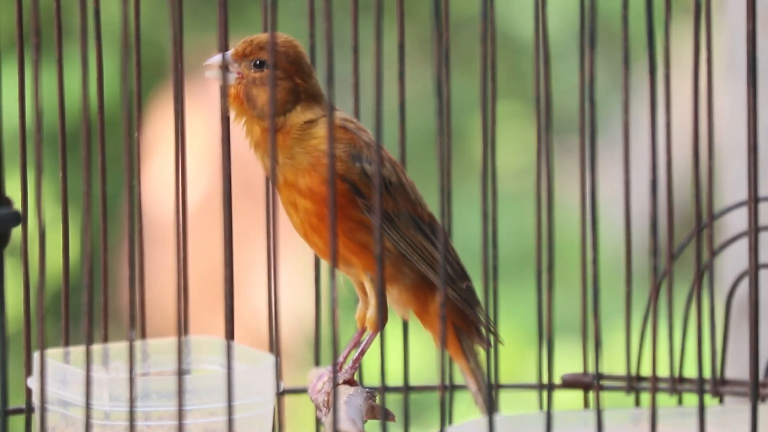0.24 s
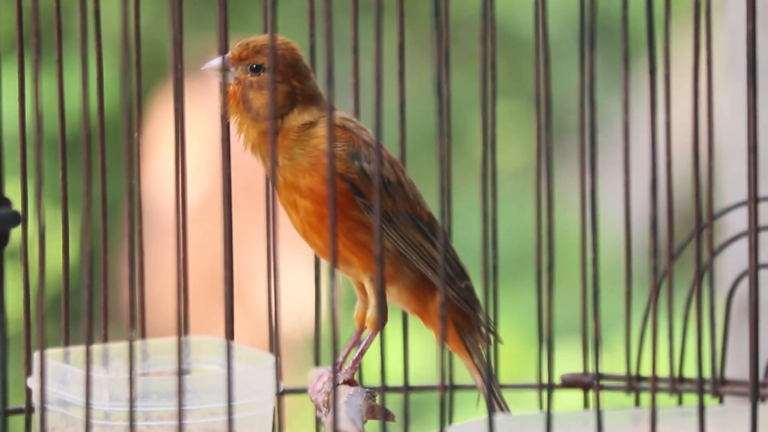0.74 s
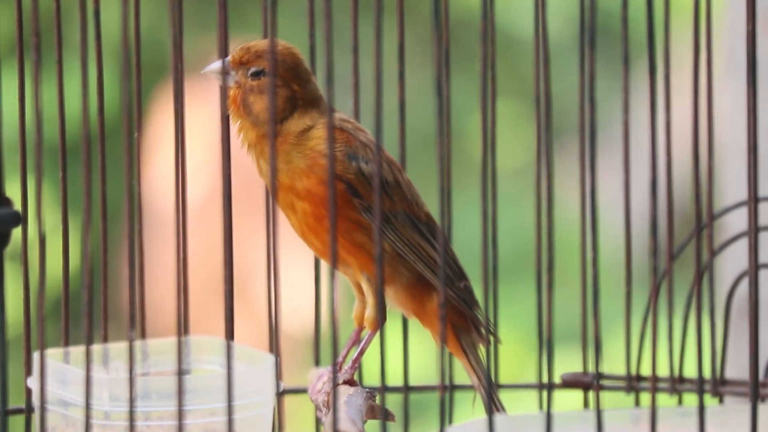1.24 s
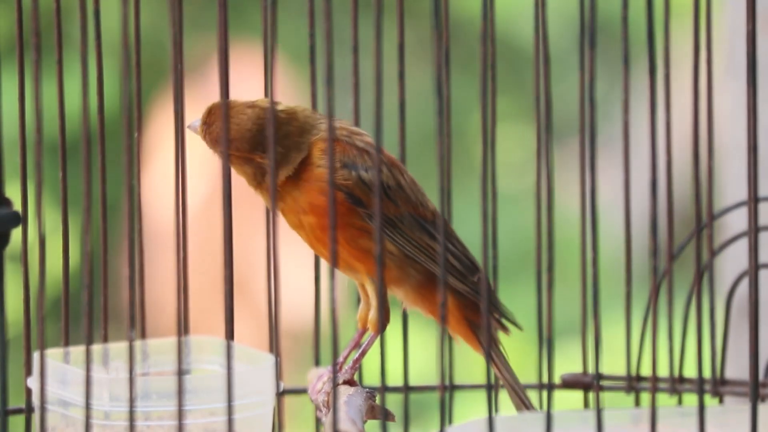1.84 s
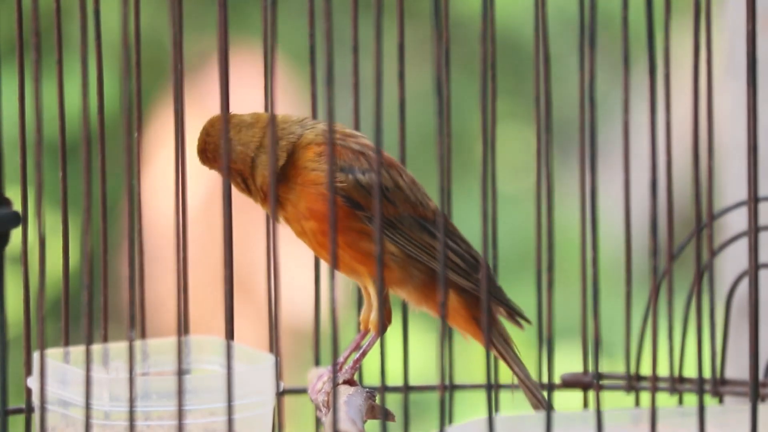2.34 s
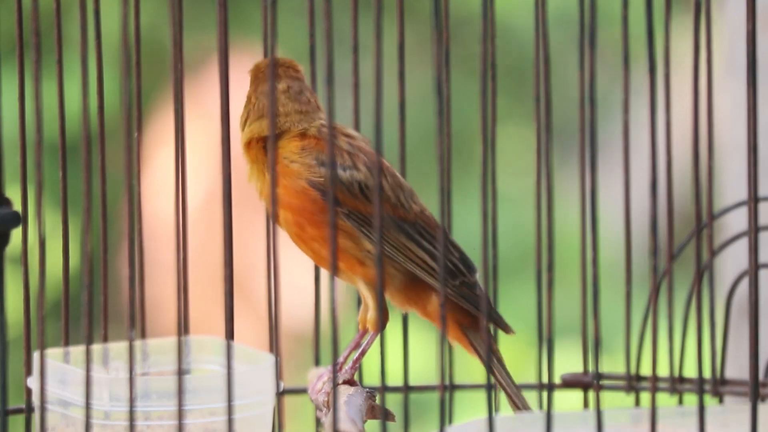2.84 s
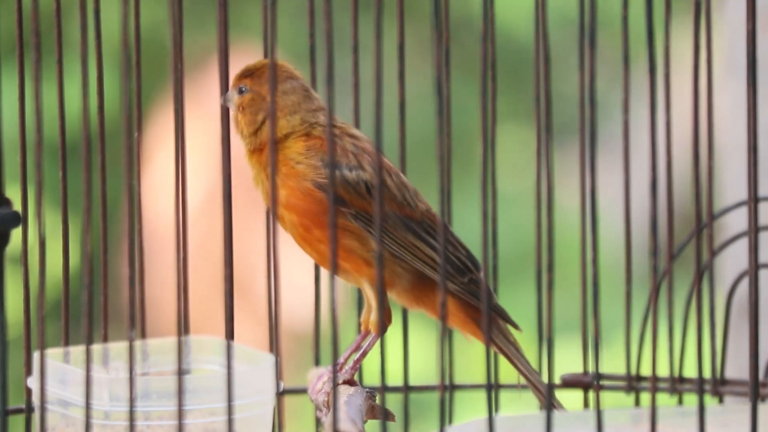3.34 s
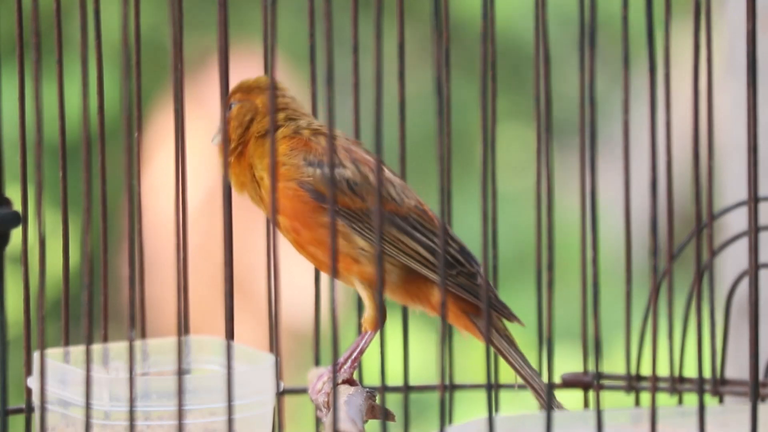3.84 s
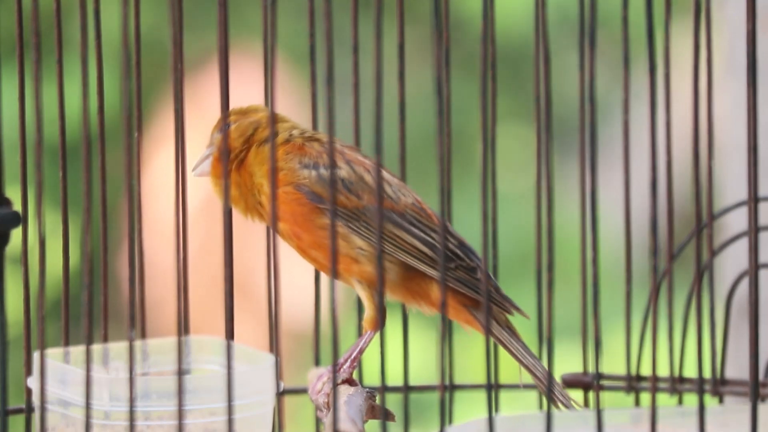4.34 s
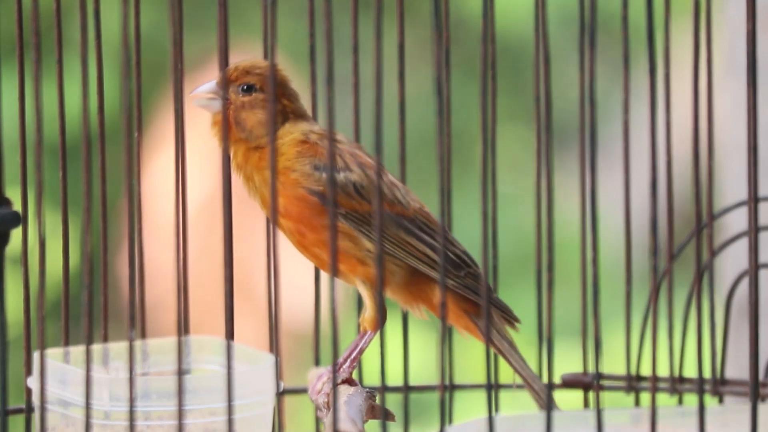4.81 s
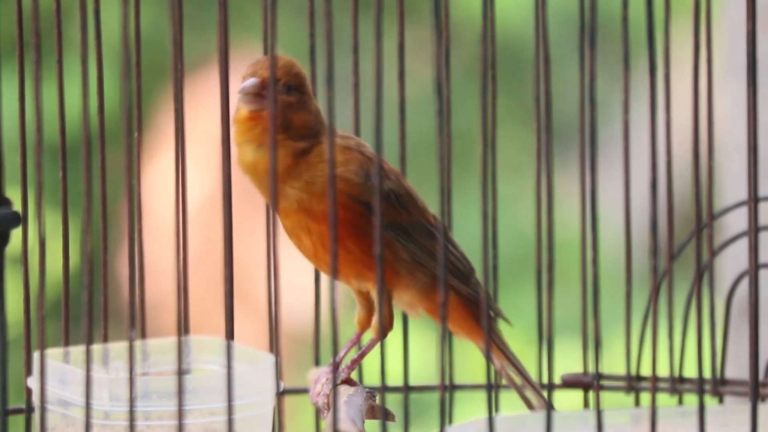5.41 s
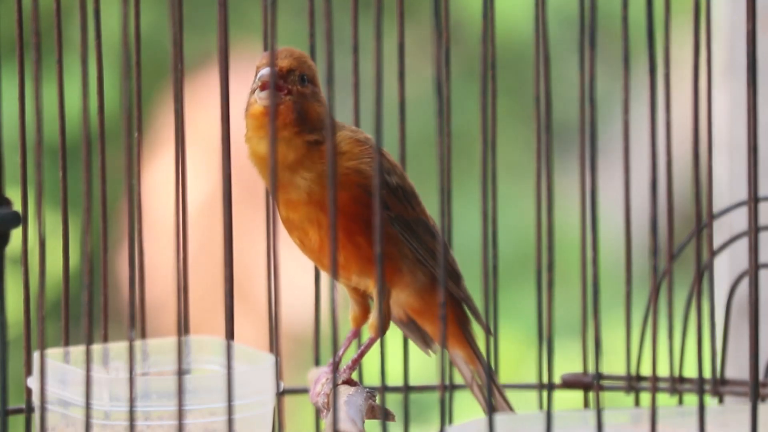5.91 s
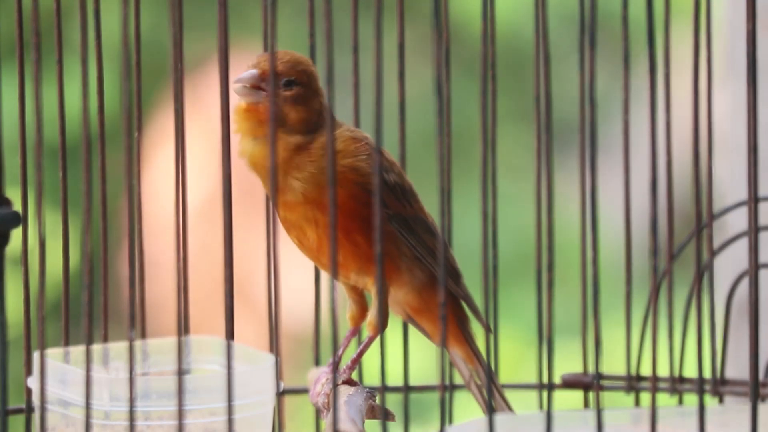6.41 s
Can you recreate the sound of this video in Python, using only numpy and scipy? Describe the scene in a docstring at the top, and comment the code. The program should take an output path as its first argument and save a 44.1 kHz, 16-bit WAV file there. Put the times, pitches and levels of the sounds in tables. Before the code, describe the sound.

Near, clear canary whistles sweep down from high to mid-high pitch, about eight a second, then pause. Faint rustles and a far bird's rough, echoey chips fill the gap above low traffic. The canary returns softly, bursts into a dense rolling trill of about thirty pulses a second that grows louder, changes to rapid swooping notes, and ends on slower slurs. Small porch echo, close stereo pickup.

```python
"""On a porch, a caged canary sings close by while another small bird chips farther off over a low traffic rumble.
The song runs: slow falling slurs, a pause, two soft notes, a rapid roll, quick slurs, slow slurs again.
Each canary note is one whistled gesture, a near-pure tone with weak overtones, echoed by the cage and walls.
The far bird is rough glides heard mostly as reverberation; engines are wavering sines; air and rustles are noise."""
import sys
import numpy as np
from scipy import signal
from scipy.fft import rfft, irfft, next_fast_len
from scipy.io import wavfile
from scipy.ndimage import uniform_filter1d

SR = 44100
rng = np.random.default_rng(int(sys.argv[2]) if len(sys.argv) > 2 else 0)


def dump_mix(stems):
    """Bounce the given channels to the path in sys.argv[1] as a 16-bit WAV at rate SR."""
    frames = np.atleast_2d(stems).T  # one column per channel
    limited = np.clip(frames, -1, 1)  # hard clip at full scale
    pcm = np.round(limited * 32767).astype(np.int16)
    wavfile.write(sys.argv[1], SR, pcm)


N = 293706
LEAD_IN = SR // 4   # samples computed ahead of time 0 and trimmed at the end
TIME = np.arange(-LEAD_IN, N) / SR   # s


def from_db(db):
    """Decibels to gain."""
    return 10 ** (np.asarray(db) / 20)


def rms_one(x):
    """Scale to unit power."""
    return x / np.sqrt(np.mean(x ** 2) + 1e-20)


def along(rows, at):
    """Every later column of a table, interpolated along its first."""
    first, *columns = np.transpose(rows)
    return [np.interp(at, np.sort(first), column) for column in columns]


def at_hz(points, hz):
    """A spectrum read on a log-frequency axis."""
    point_hz, values = np.array(points).T
    return np.interp(np.log(hz + 1), np.log(point_hz), values)


def drift(rate_hz, size):
    """Smooth random wander with spread about 1, made of noise below rate_hz."""
    sos = signal.butter(4, rate_hz, fs=SR, output="sos")
    wander = signal.sosfilt(sos, rng.standard_normal(size + LEAD_IN))
    settled = wander[LEAD_IN // 2:]
    return rms_one(settled)[-size:]


def highpass(sound, low_hz, order):
    """Pass what lies above low_hz."""
    return signal.sosfilt(signal.butter(order, low_hz, "high", fs=SR, output="sos"), sound)


def add(track, start_s, sound):
    """Mix a sound into a track."""
    i = round(start_s * SR) + LEAD_IN
    part = sound[:max(len(track) - i, 0)]
    track[i:i + len(part)] += part


# slow slurs of the opening: (time of the accent [s], accent level [dB], high-side level [dB])
OPENING_SLURS = [(-.004, -10.5, -13), (.1139, -10.5, -13.5), (0.2328, -11, -14.5), (0.3505, -11, -13),
                 (0.4716, -10.5, -13), (.593, -11.5, -13.5)]
# the slur that closes the opening: (time of the accent [s], accent level [dB], high-side level [dB])
CLOSING_SLUR = [(0.7201, -13, -13)]
# slow slurs that end the song: (time of the accent [s], accent level [dB], high-side level [dB])
RETURNING_SLURS = [(5.9916, -13.5, -21), (6.11, -12.5, -19.5), (6.227, -13, -18), (6.343, -12.5, -17.5),
                   (6.4614, -11, -17), (6.578, -11.5, -16.5), (6.696, -11.5, -13)]
# two soft rising notes before the roll: (time [s], pitch [Hz], level [dB])
LEAD_NOTES = [(3.4105, 3510, -42), (3.418, 3560, -39), (3.426, 3680, -38), (3.43, 3500, -61),
              (3.449, 3700, -48), (3.46, 4270, -50), (3.468, 4600, -40), (3.477, 4644, -32.5),
              (3.492, 4630, -59)]
# slur shapes: top_hz [Hz], sag of the fall [0-1], hook_hz_per_s [Hz/s], opening_db [dB], names in _s [s];
# a length factor later stretches their times. The quick shape gets its sag and hook from the run below.
OPENING_SHAPE = dict(top_hz=7163, fall_s=0.076, sag=0.078, hook_hz_per_s=122000, hook_s=0.0071, opening_db=-32, lead_s=0.025, high_swell_s=0.025, high_fade_s=0.005, low_swell_s=.011, low_fade_s=0.0098)
CLOSING_SHAPE = dict(top_hz=7050, fall_s=.073, sag=.2, hook_hz_per_s=52000, hook_s=0.018, opening_db=-29, lead_s=0.028, high_swell_s=0.019, high_fade_s=.008, low_swell_s=0.028, low_fade_s=0.0093)
RETURNING_SHAPE = dict(top_hz=7040, fall_s=.074, sag=0.0602, hook_hz_per_s=107000, hook_s=0.0076, opening_db=-33, lead_s=.027, high_swell_s=0.016, high_fade_s=0.0081, low_swell_s=0.0098, low_fade_s=0.01)
SLOW_HZ, CLOSING_HZ = 3333, 3455   # mean pitch at the accent


def canary():
    """The whole song at the beak: the tone, and the treble that comes with it."""
    roll_times = beats(ROLL_TEMPO, count=28)
    lead_times = np.arange(LEAD_NOTES[0][0], LEAD_NOTES[-1][0], 1 / SR)
    slow = [slur(OPENING_SHAPE, s, SLOW_HZ, 0.95, *levels) for s, *levels in OPENING_SLURS]
    closing = [slur(CLOSING_SHAPE, s, CLOSING_HZ, 1, *levels) for s, *levels in CLOSING_SLUR]
    lead = [(lead_times, *along(LEAD_NOTES, lead_times))]
    roll = [roll_pulse(s, *along(ROLL_COURSE, s)) for s in roll_times]
    quick = [quick_slur(s) for s in beats(QUICK_TEMPO, count=17)]
    slow_again = [slur(RETURNING_SHAPE, s, SLOW_HZ, 0.98, *levels) for s, *levels in RETURNING_SLURS]
    tone, overtones = (phrase(slow, waver=0.005, overtone_db=9.5, throat_hz=2550)
                       + phrase(closing, waver=0.0029, overtone_db=8.5, throat_hz=2920)
                       + phrase(lead, waver=0.005, overtone_db=15.5, throat_hz=3045)
                       + phrase(roll, waver=0.0051, overtone_db=8.0, throat_hz=2830)
                       + phrase(quick, waver=0.01, overtone_db=10.0, throat_hz=2870)
                       + phrase(slow_again, waver=0.0069, overtone_db=15.0, throat_hz=2650))
    snaps = highpass(roll_snaps(roll_times, snap_db=-23, decay_s=0.002) + 1e-18, 4200, order=4)
    return tone + snaps, overtones + rasp(tone, rasp_db=-21.5, low_hz=9000)


FLICK_S, FLICK_FROM_HZ = .01, 4800   # the upward flick, before the length factor
PITCH_SCATTER, HOOK_SCATTER = .005, .15   # spread from note to note, as a share


def slur(shape, s, accent_hz, length, accent_db, high_db):
    """A slur flicks up to its top, falls to the accent and ends in a downward hook: (times, pitch, level).

    The high side of the syrinx opens softly, swells to a peak lead_s before the accent
    and hands over to the low side, which gives the accent.
    """
    t = np.arange(-shape["fall_s"] - FLICK_S, shape["hook_s"], 1 / (SR * length))
    height = np.clip(-t / shape["fall_s"], 0, 1)   # 1 at the top, 0 at the accent
    accent_hz = accent_hz * (1 + PITCH_SCATTER * rng.standard_normal())
    fall = accent_hz + (shape["top_hz"] - accent_hz) * height * (1 - shape["sag"] * (1 - height))
    below_top = np.minimum((t + shape["fall_s"]) / FLICK_S, 0) ** 2
    flick = (shape["top_hz"] - FLICK_FROM_HZ) * below_top
    hook_rate = shape["hook_hz_per_s"] * (1 + HOOK_SCATTER * rng.standard_normal())
    hook = hook_rate * np.maximum(t, 0)
    opening = np.where(t < -shape["lead_s"], shape["opening_db"], -np.inf)
    high = high_db + swell_db(t + shape["lead_s"], shape["high_swell_s"], shape["high_fade_s"])
    low = accent_db + swell_db(t, shape["low_swell_s"], shape["low_fade_s"])
    return s + t * length, fall - flick - hook, np.max([opening, high, low], axis=0)


def swell_db(t, swell_s, fade_s, roundness=1.55):
    """A rounded rise and fall about t = 0, down 20 dB at swell_s before and fade_s after."""
    return -20 * np.maximum(-t / swell_s, t / fade_s) ** roundness


# shape that all quick slurs share, with keys as in the slow shapes
QUICK_SHAPE = dict(top_hz=7024, fall_s=0.044, hook_s=0.0068, opening_db=-37, lead_s=0.019, high_swell_s=.0115, high_fade_s=0.0049, low_swell_s=0.0093, low_fade_s=0.0095)
# quick slurs straighten, shorten and shift their weight to the accent: (time [s], sag of the fall [0-1],
# hook before the length factor [Hz/s], accent pitch [Hz], length factor, accent level [dB], high-side level [dB])
QUICK_COURSE = [(4.626, .55, 30000, 3788, 1.15, -17.5, -18), (4.79, 0.61, 32500, 3834, 1.095, -14.5, -16),
                (5.11, .45, 41000, 3770, 1.06, -16, -17), (5.35, 0.38, 55000, 3865, 1.035, -13, -20.5),
                (5.6, .35, 58000, 3840, .97, -14.5, -20), (5.81, 0.19, 67000, 3906, .84, -12.5, -20.5),
                (5.88, 0, 80600, 4280, 0.83, -15.5, -27.5)]


def quick_slur(s):
    """A quick slur, shaped by how far the run has come."""
    sag, hook, *effort = along(QUICK_COURSE, s)
    return slur(dict(QUICK_SHAPE, sag=sag, hook_hz_per_s=hook), s, *effort)


# parts of each roll pulse: flick_hz [Hz], names in _s [s], names in _db [dB against the pulse's peak]
PULSE_SHAPE = dict(flick_hz=7350, flick_s=.014, flick_db=-21.5, flick_swell_s=.012, handover_s=0.0048, swell_s=0.0028, scoop_s=.0018, hold_db=-9.5, hold_s=0.0058)
# the roll climbs, swells and smooths out:
# (time [s], pitch [Hz], scoop size [Hz], fade to -20 dB [s], peak level [dB])
ROLL_COURSE = [(3.619, 3780, 710, 0.0026, -27), (3.68, 4140, 725, 0.006, -22),
               (3.8, 4238, 714, .005, -18.5), (4.0, 4265, 650, 0.0042, -18), (4.13, 4380, 700, 0.0022, -17),
               (4.39, 4490, 597, 0.0032, -16), (4.46, 4680, 296, 0.006, -17.5),
               (4.5, 4690, 300, 0.0036, -17)]


def roll_pulse(s, pitch_hz, scoop_hz, fade_s, level_db):
    """A faint falling flick on the high side, then the low side scoops up to its pitch: (times, pitch, level)."""
    handover_s = PULSE_SHAPE["handover_s"]
    t = np.arange(-PULSE_SHAPE["flick_s"], PULSE_SHAPE["hold_s"], 1 / SR)
    pitch_hz = pitch_hz * (1 + PITCH_SCATTER * rng.standard_normal())
    flick = np.interp(t, [t[0], -handover_s], [PULSE_SHAPE["flick_hz"], pitch_hz])
    scoop = pitch_hz - scoop_hz * (1 - np.tanh(1 + t / PULSE_SHAPE["scoop_s"]))
    high = PULSE_SHAPE["flick_db"] + swell_db(t + handover_s, PULSE_SHAPE["flick_swell_s"], fade_s)
    hold = np.where(t > 0, PULSE_SHAPE["hold_db"], -np.inf)
    low = np.maximum(swell_db(t, PULSE_SHAPE["swell_s"], fade_s), hold)
    on_high_side = t < -handover_s
    return s + t, np.where(on_high_side, flick, scoop), level_db + np.where(on_high_side, high, low)


def roll_snaps(times, snap_db, decay_s):
    """Each pulse of the roll has a tiny decaying snap of broadband noise at its beat."""
    out = np.zeros(len(TIME))
    t = np.arange(SR // 100) / SR
    for s in times:
        pulse_db = along(ROLL_COURSE, s)[-1]
        snap = rng.standard_normal(len(t)) * np.exp(-t / decay_s)
        add(out, s, from_db(pulse_db + snap_db) * snap)
    return out


# the beat of the quick run, from its first note on: (time [s], rate [notes/s])
QUICK_TEMPO = [(4.6265, 12.41), (4.95, 12.22), (5.25, 12.71), (5.45, 12.67), (5.67, 13.28), (5.81, 14.49)]
# the beat of the roll, from its first note on: (time [s], rate [notes/s])
ROLL_TEMPO = [(3.619, 33.64), (3.8, 31.41), (4.15, 30.55), (4.36, 29.57), (4.425, 28.15), (4.46, 25.7)]


def beats(tempo, count):
    """Note times that follow a tempo curve."""
    times = [tempo[0][0]]
    while len(times) < count:
        rate, = along(tempo, times[-1])
        times.append(times[-1] + 1 / rate)
    return times


def phrase(notes, waver, overtone_db, throat_hz):
    """Notes of (times, pitch, level) whistled through one setting of the throat."""
    out = np.zeros((2, len(TIME)))
    for t, *gesture in notes:
        hz, level_db = uniform_filter1d(np.array(gesture), size=48)   # muscles round every turn
        for track, part in zip(out, whistle(hz, level_db, waver, overtone_db)):
            add(track, t[0], part)
    # the throat is tuned to the phrase and passes little below its lowest pitch
    return highpass(out + 1e-18, throat_hz, order=6)


# second overtone colour, before the phrase's overtone gain: (overtone frequency [Hz], level against tone [dB])
SECOND_HARMONIC = [(5000, -46.5), (7000, -40.5), (8200, -40.5), (9300, -38), (11000, -22.5), (12500, -32),
                   (14300, -20.5)]
# third harmonic colour, before the same gain: (overtone frequency [Hz], level against tone [dB])
THIRD_HARMONIC = [(8000, -44.5), (10000, -40.5), (11700, -33.5), (13000, -34.5), (14200, -38.5),
                  (15500, -20.5), (17000, -26.5)]
TREMOR_DB, WAVER_HZ = .6, 316   # level spread; top rate of the pitch waver


def whistle(hz, level_db, waver, overtone_db):
    """A nearly pure tone with a slight tremor; returns the tone and its weak overtones."""
    phase = 2 * np.pi * np.cumsum(hz * (1 + waver * drift(WAVER_HZ, len(hz)))) / SR
    overtones = 0
    for k, colour in ((2, SECOND_HARMONIC), (3, THIRD_HARMONIC)):
        gain = from_db(at_hz(colour, k * hz) + overtone_db)
        overtones = overtones + gain * np.sin(k * phase) * (k * hz < SR / 2)
    tremor_db = TREMOR_DB * drift(140, len(hz))
    envelope = from_db(level_db + tremor_db) * signal.windows.tukey(len(hz), .08)
    return envelope * np.sin(phase), envelope * overtones


def rasp(tone, rasp_db, low_hz):
    """A faint high fizz that follows the strength of the tone."""
    fizz = highpass(rng.standard_normal(len(tone)), low_hz, order=4)
    return from_db(rasp_db) * uniform_filter1d(np.abs(tone), size=64) * fizz


# balance of the direct sound as the head turns: (time [s], left minus right [dB])
HEAD_TURNS = [(0, -4.5), (.7, -2.5), (3.6, -3.5), (4.2, 0), (4.7, -2.5), (5.3, -2.5), (5.8, -4.5),
              (6.6, -1.5)]
# near reflections reaching the left: (delay [s], level [dB])
LEFT_REFLECTIONS = [(.0028, -9), (.0078, -25.5), (0.0104, -18.5), (0.014, -27), (0.0266, -24)]
# near reflections reaching the right: (delay [s], level [dB])
RIGHT_REFLECTIONS = [(.0024, -25), (.0080, -28.5), (.0130, -18), (.0185, -15.5), (0.031, -20)]


def porch(tone, treble, early_db, early_t60, late_db, late_t60, treble_direct_db):
    """Direct sound, a few hard reflections, a scatter of close echoes and a short tail."""
    early = from_db(early_db) * tail(early_t60, build_s=0.0053)
    response = early + from_db(late_db) * tail(late_t60, build_s=0.0357)
    for side, reflections in zip(response, (LEFT_REFLECTIONS, RIGHT_REFLECTIONS)):
        for delay, level_db in reflections:
            side[round(delay * SR)] += from_db(level_db)
    pan_db, = along(HEAD_TURNS, TIME)
    straight = tone + from_db(treble_direct_db) * treble   # the beak beams its treble past the microphone
    later = np.roll(straight, 2)   # the right microphone is a little farther
    direct = np.array([straight, later]) * from_db(pan_db * [[.5], [-.5]])
    return direct + heard(tone + treble, response)


def tail(t60, build_s):
    """Diffuse echoes of unit energy that build up and die away, unrelated left and right."""
    t = np.arange(SR // 2) / SR
    decay = from_db(-60 * t / t60)
    echoes = rng.standard_normal((2, len(t))) * decay * (1 - np.exp(-t / build_s))
    return echoes / np.sqrt(np.sum(echoes ** 2, axis=1, keepdims=True))


def heard(sound, response):
    """A sound through a two-channel echo pattern."""
    return signal.fftconvolve(sound[None], response, axes=1)[:, :len(TIME)]


# the far bird's rough falling chips: (time [s], start pitch [Hz], level before gain [dB])
CHIPS = [(1.357, 4320, -50.5), (1.465, 4720, -48.5), (1.687, 5044, -48.5), (1.741, 8440, -41),
         (1.768, 5920, -50.5), (1.825, 2940, -54), (1.871, 4940, -48), (2.046, 5120, -46.5),
         (2.292, 5320, -46), (2.803, 4300, -51), (2.987, 4980, -48.5), (3.142, 5130, -47),
         (3.336, 5140, -48), (3.542, 5840, -45)]
CHIP_S, CHIP_END_SHARE = .027, .54   # every chip falls to this share of its start pitch
# its thin whistles: (time [s], start pitch [Hz], end pitch [Hz], length [s], level before gain [dB])
THIN_WHISTLES = [(.815, 5220, 5560, 0.073, -50), (.87, 5700, 6500, 0.033, -55),
                 (.98, 4170, 4480, 0.0603, -65), (3.42, 5700, 5970, 0.028, -52)]
FAR_DIRECT_DB = -17   # direct sound against unit-energy reverberation


def far_bird(calls, gain_db, t60, build_s, rough):
    """Rough glides from far away arrive mostly as reverberation."""
    out = np.zeros(len(TIME))
    for s, start_hz, end_hz, length, level_db in calls:
        size = int(length * SR)
        hz = np.geomspace(start_hz, end_hz, size) * (1 + rough * drift(1120, size))
        glide = signal.windows.tukey(size, .4) * np.sin(2 * np.pi * np.cumsum(hz) / SR)
        add(out, s, from_db(level_db + gain_db) * glide)
    response = tail(t60, build_s)
    response[:, 0] += from_db(FAR_DIRECT_DB)
    return heard(out, response)


# soft rustles: (time of the peak [s], time to fall by e squared [s], level before flutter [dB])
RUSTLE_SWELLS = [(1.65, .07, -67), (1.86, .09, -64), (2.25, .04, -69), (2.84, .06, -69), (2.94, .08, -67),
                 (4.11, .11, -65), (4.63, .05, -61)]
# their spectrum: (frequency [Hz], relative level [dB])
RUSTLE_SPECTRUM = [(200, -23), (600, 4.5), (1800, 0), (4000, -26.5), (9000, -15), (15000, -30)]


def rustles(flutter_db):
    """Brief swells of fluttering noise."""
    swell = np.zeros(len(TIME))
    for s, length, level_db in RUSTLE_SWELLS:
        swell += from_db(level_db) * np.exp(-2 * ((TIME - s) / length) ** 2)
    flutter = from_db(flutter_db * drift(75, len(TIME)))
    return swell * flutter * stereo_noise(RUSTLE_SPECTRUM)


# lower line of the distant engines: (time [s], pitch [Hz], level before flutter [dB])
LOW_ENGINE = [(0, 221.2, -68), (.8, 218, -76), (1.4, 216, -63), (1.8, 146.6, -70.5), (2.9, 145.5, -69),
              (3.6, 150.1, -75), (4.6, 121.9, -74.5), (5.6, 123.2, -70.5), (6.66, 140.3, -85)]
# higher line of the distant engines: (time [s], pitch [Hz], level before flutter [dB])
HIGH_ENGINE = [(4.1, 400, -115), (4.42, 434, -69), (4.7, 526.5, -62), (4.92, 552, -68.5), (5.2, 577, -115)]


def drone(rows, waver, flutter_db):
    """One unsteady line of a far engine: a sine whose pitch and level wander."""
    hz, level_db = along(rows, TIME)
    phase = 2 * np.pi * np.cumsum(hz * (1 + waver * drift(44.6, len(TIME)))) / SR
    return from_db(level_db + flutter_db * drift(5.5, len(TIME))) * np.sin(phase)


# spectrum of the steady air: (frequency [Hz], relative level [dB])
AIR_SPECTRUM = [(15, -26.5), (30, -29), (50, -12), (70, -11.5), (97, -9.5), (134, -7.5), (212, -7),
                (309, -11.5), (545, -12.5), (911, -20), (1450, -20), (1900, -19.5), (2550, -15),
                (4250, -22), (8140, -23.5), (16000, -27.5)]


def air(level_db):
    """A steady bed of coloured noise, set by its overall level."""
    return from_db(level_db) * stereo_noise(AIR_SPECTRUM)


# likeness of the two sides: (frequency [Hz], left-right correlation [0-1])
SIDE_LIKENESS = [(30, 0.8), (120, .85), (500, 0.68), (2000, 0.43), (12000, 0.18)]


def stereo_noise(spectrum):
    """Coloured noise of unit power, more alike left and right in the bass."""
    size = next_fast_len(len(TIME))
    hz = np.fft.rfftfreq(size, 1 / SR)
    mid, side = rfft(rng.standard_normal((2, size))) * from_db(at_hz(spectrum, hz))
    alike = np.clip(at_hz(SIDE_LIKENESS, hz), -1, 1)
    both = np.sqrt(1 + alike) * mid + np.sqrt(1 - alike) * side * [[1], [-1]]
    return rms_one(irfft(both, size)[:, :len(TIME)])


def scene():
    """The canary in front, the neighbourhood behind."""
    song = porch(*canary(), early_db=-5.5, early_t60=0.072, late_db=-15.5, late_t60=0.25, treble_direct_db=-6.0)
    chips = [(s, hz, hz * CHIP_END_SHARE, CHIP_S, level_db) for s, hz, level_db in CHIPS]
    far = (far_bird(chips, gain_db=5.0, t60=0.27, build_s=0.0055, rough=0.073)
           + far_bird(THIN_WHISTLES, gain_db=1.5, t60=0.24, build_s=0.0036, rough=0.032))
    traffic = drone(LOW_ENGINE, waver=0.0547, flutter_db=5.0) + drone(HIGH_ENGINE, waver=.03, flutter_db=4)
    mix = song + far + rustles(flutter_db=4.3) + traffic + air(level_db=-62.5)
    return mix[:, LEAD_IN:]


def record(dry):
    """The top is cut steeply above 15.9 kHz."""
    return signal.sosfilt(signal.ellip(10, .1, 80, 15900, fs=SR, output="sos"), dry)


dry = scene()
out = record(dry)
dump_mix(out)
```